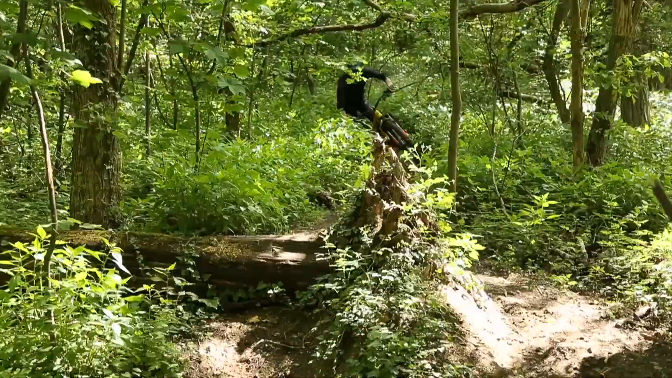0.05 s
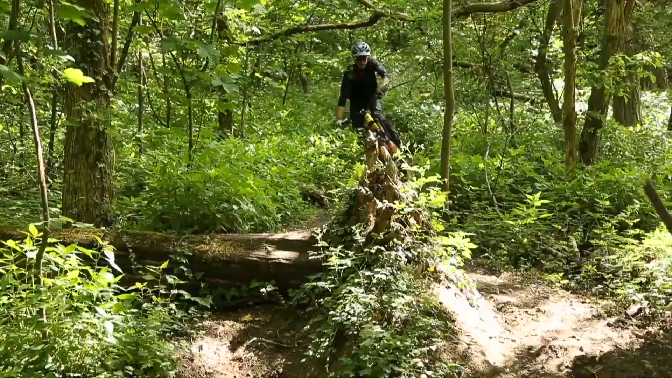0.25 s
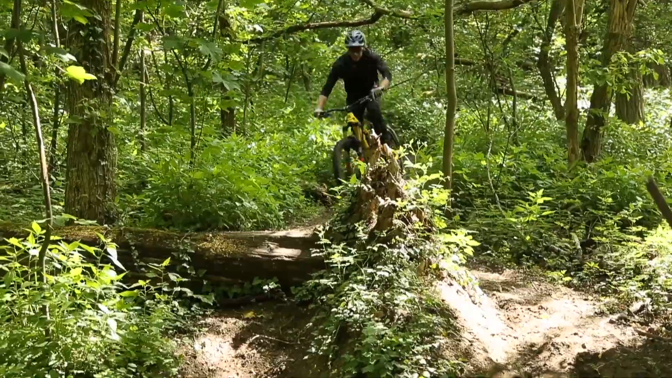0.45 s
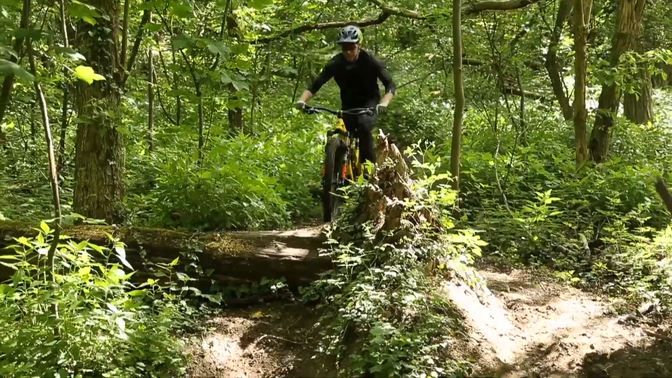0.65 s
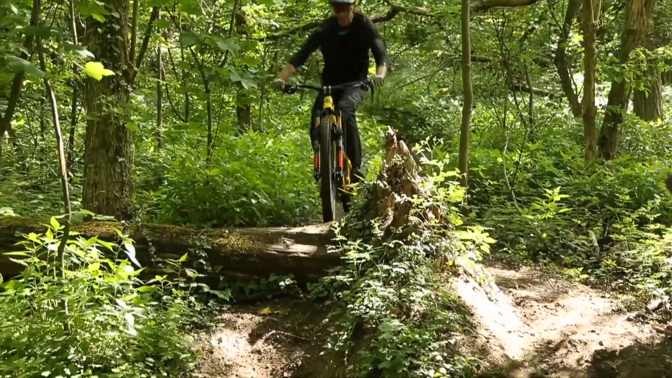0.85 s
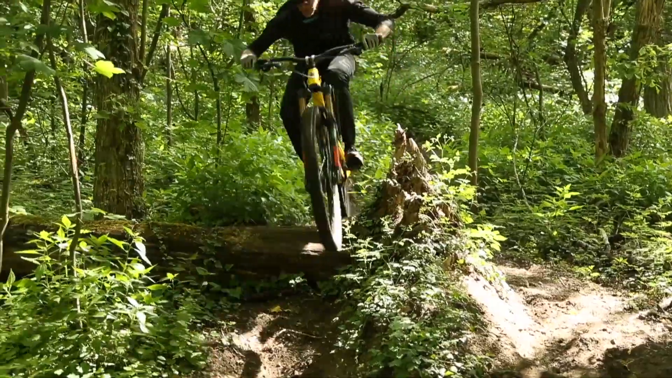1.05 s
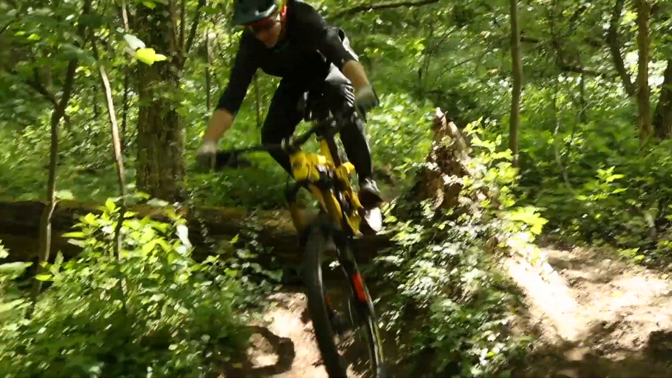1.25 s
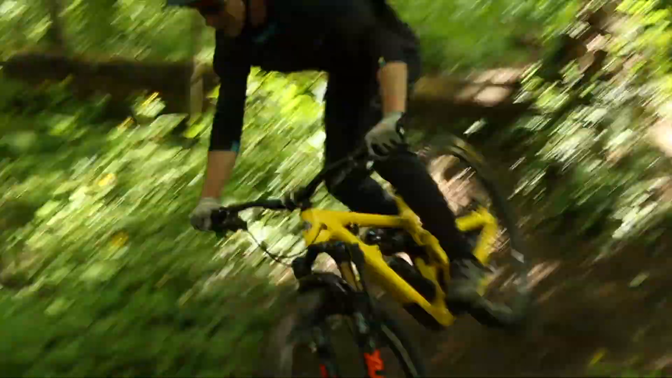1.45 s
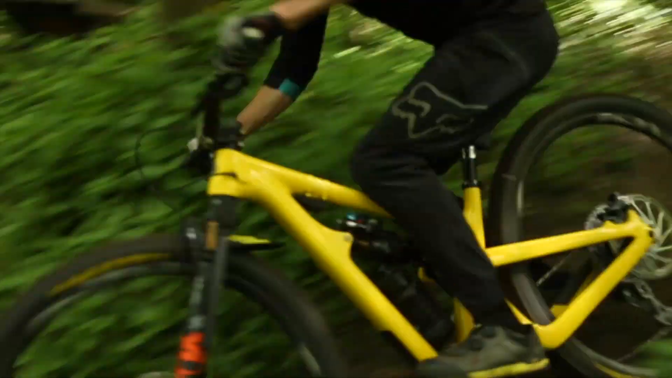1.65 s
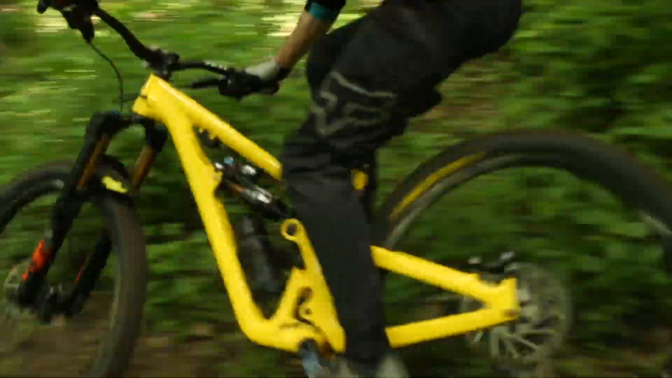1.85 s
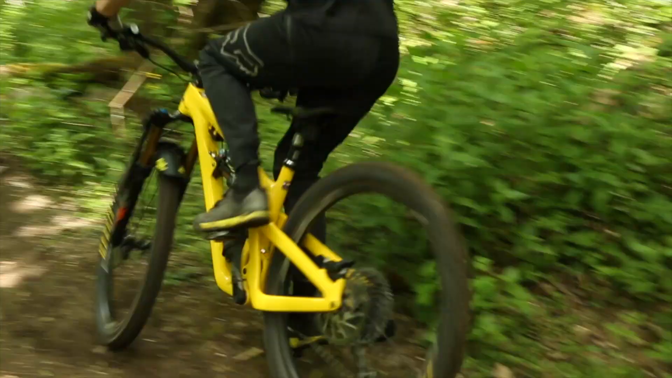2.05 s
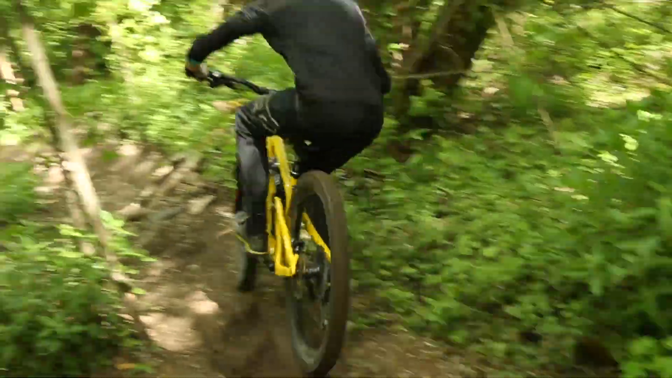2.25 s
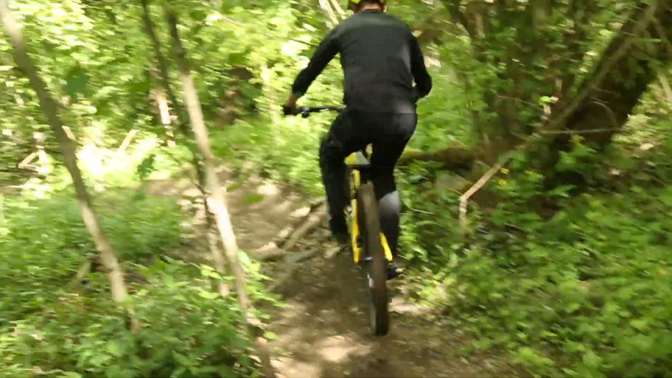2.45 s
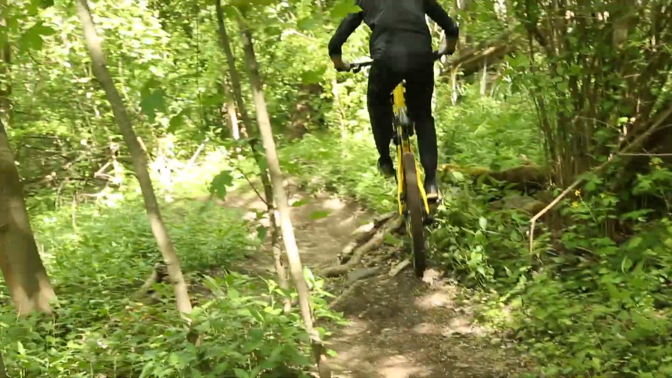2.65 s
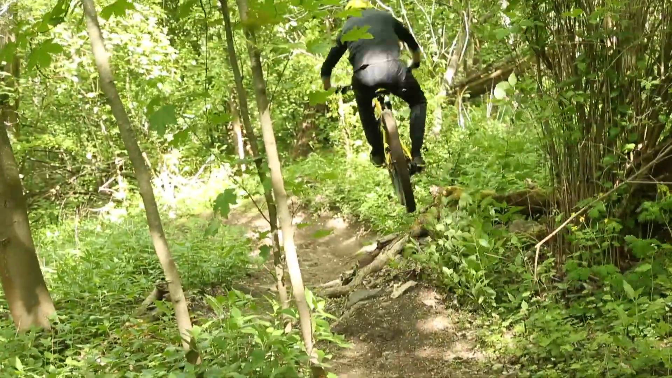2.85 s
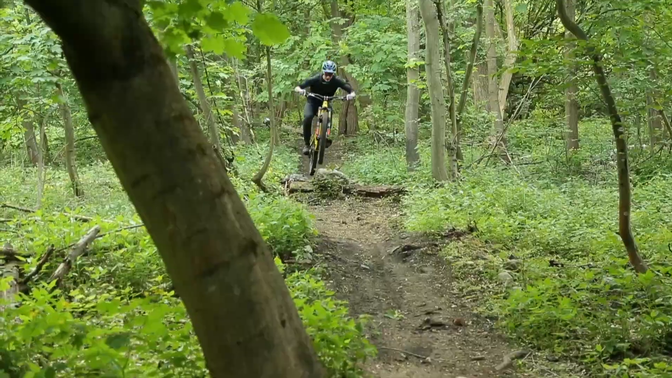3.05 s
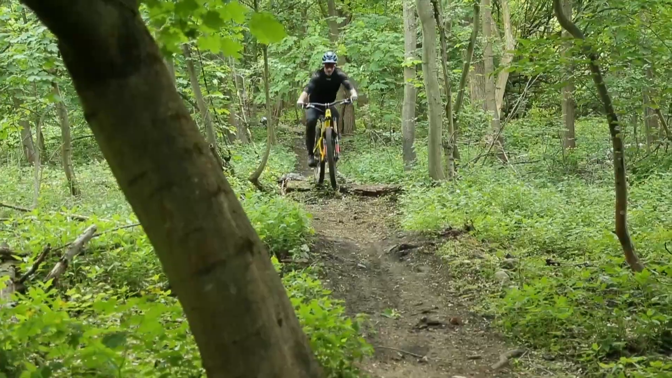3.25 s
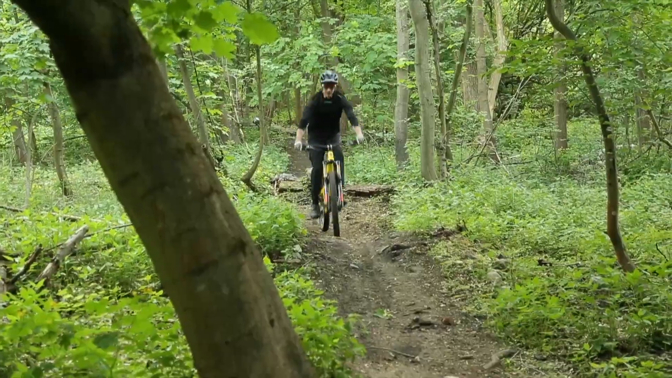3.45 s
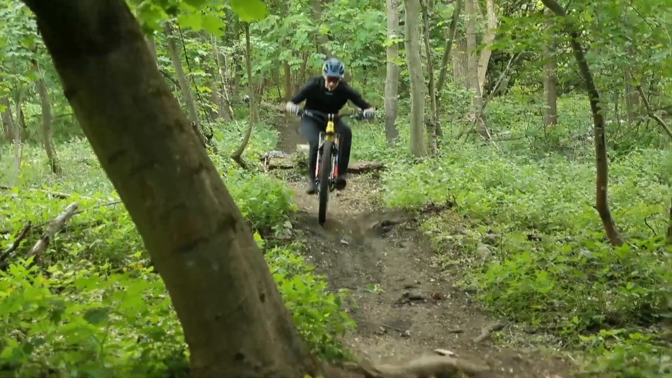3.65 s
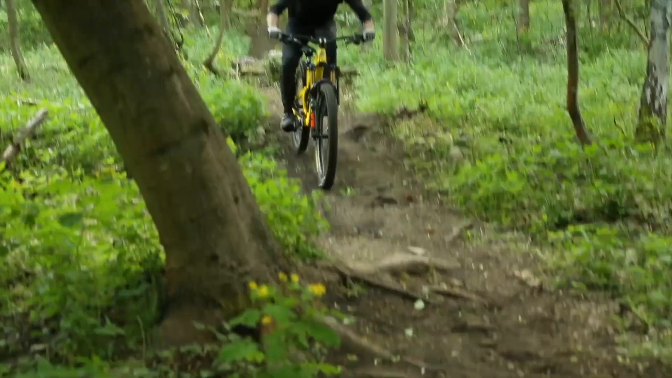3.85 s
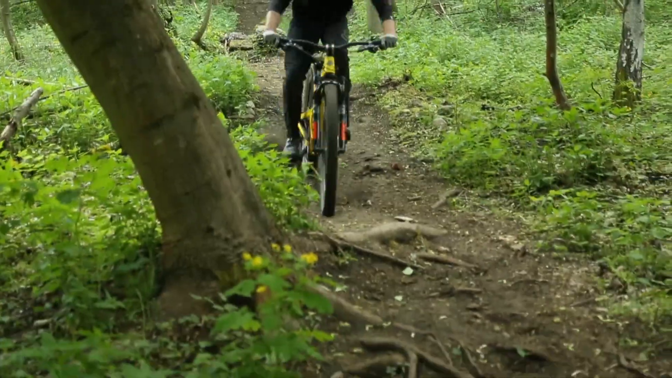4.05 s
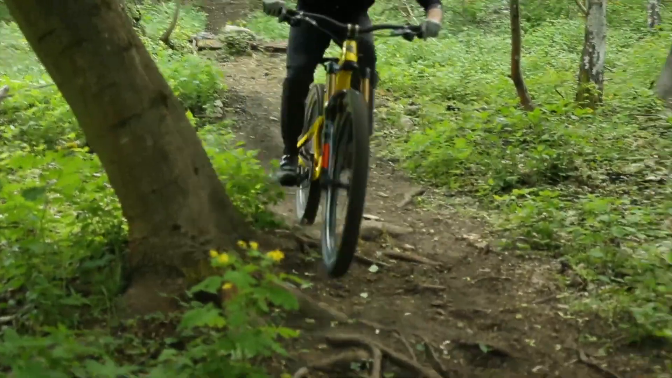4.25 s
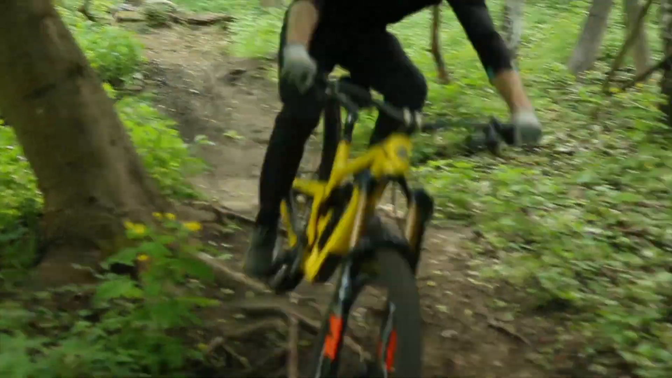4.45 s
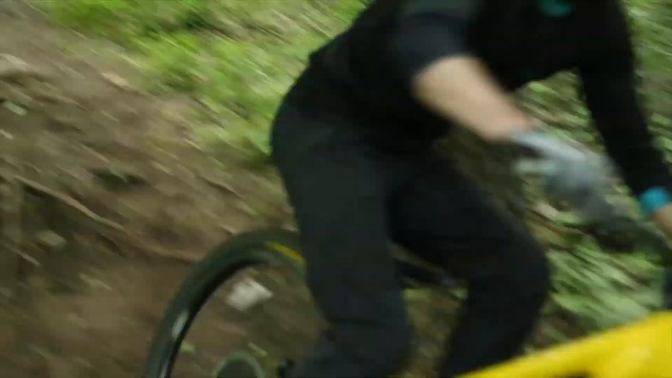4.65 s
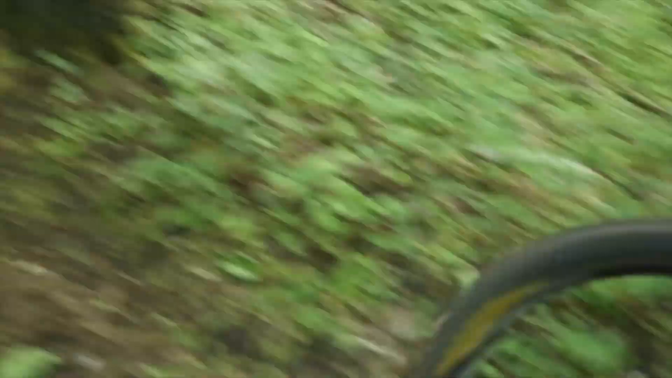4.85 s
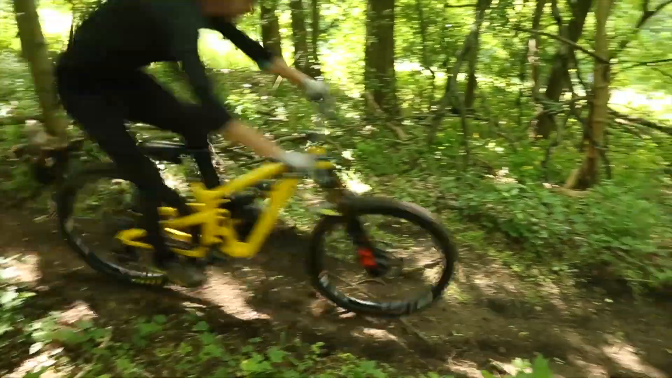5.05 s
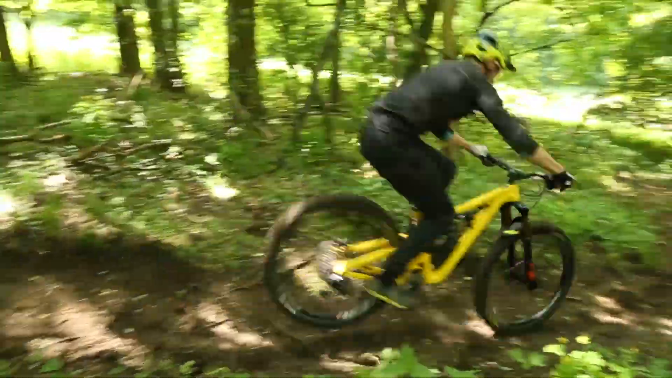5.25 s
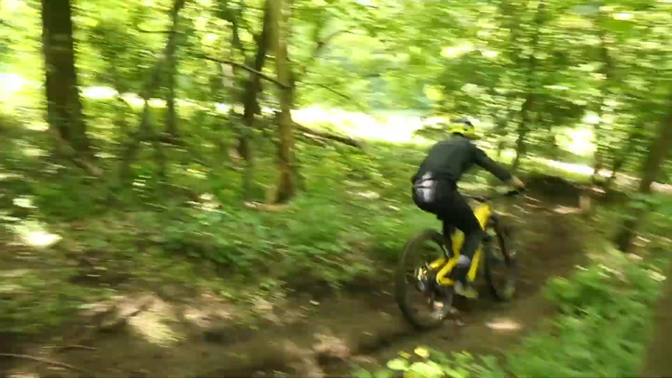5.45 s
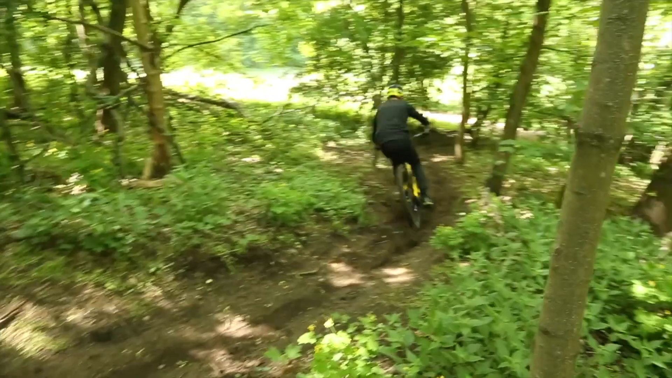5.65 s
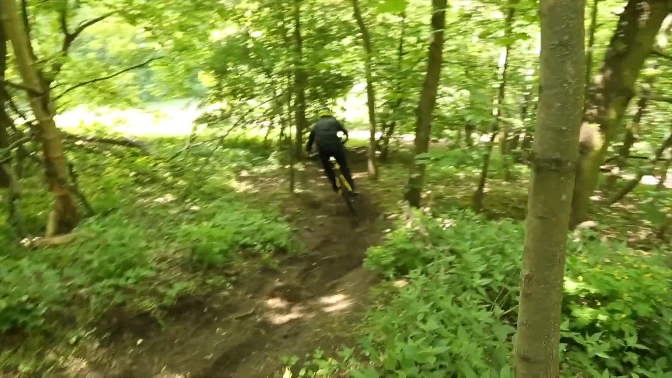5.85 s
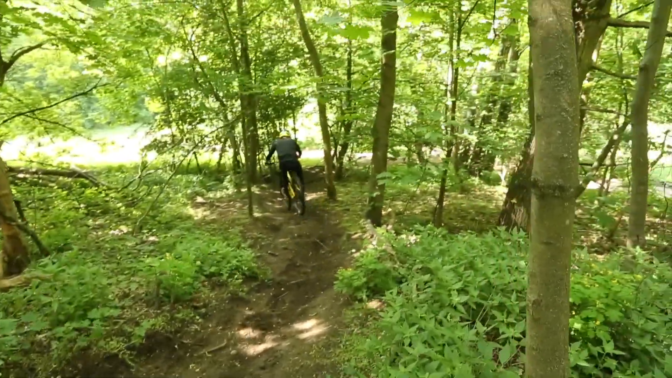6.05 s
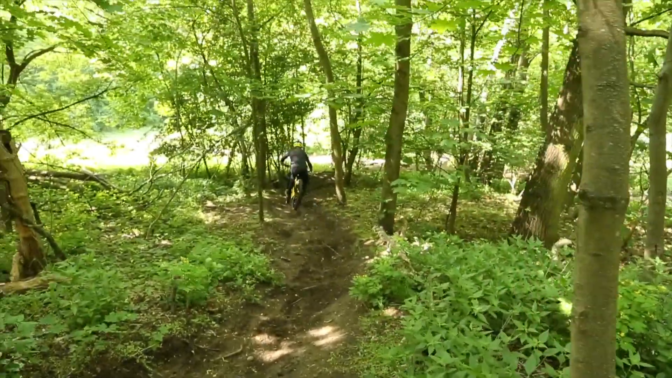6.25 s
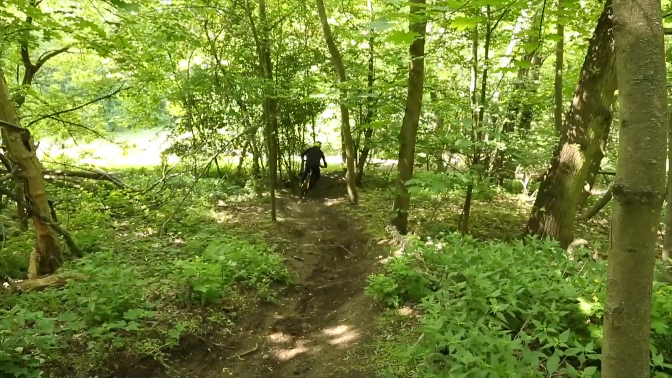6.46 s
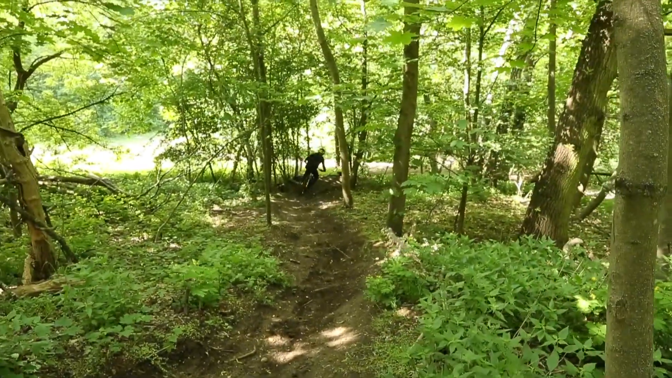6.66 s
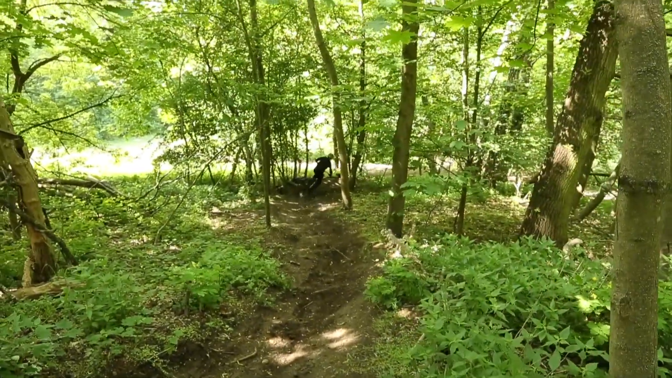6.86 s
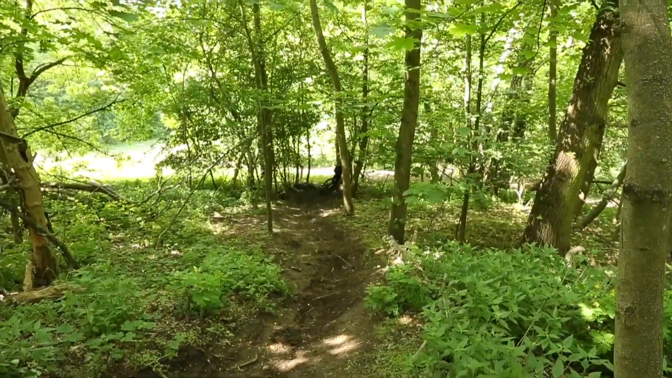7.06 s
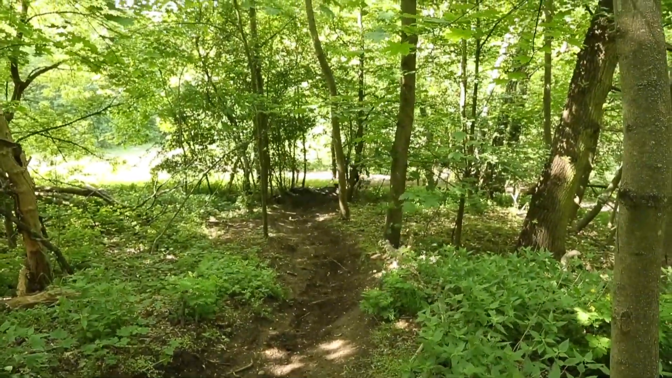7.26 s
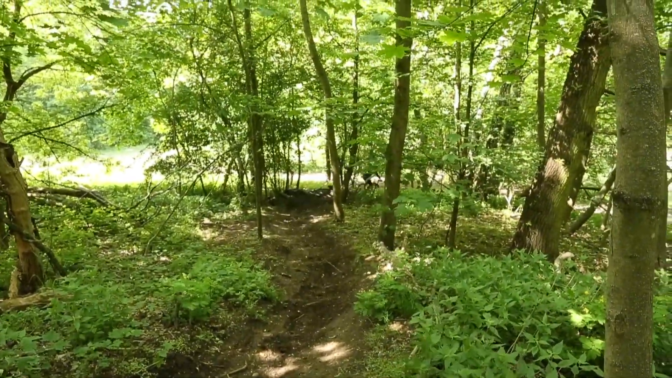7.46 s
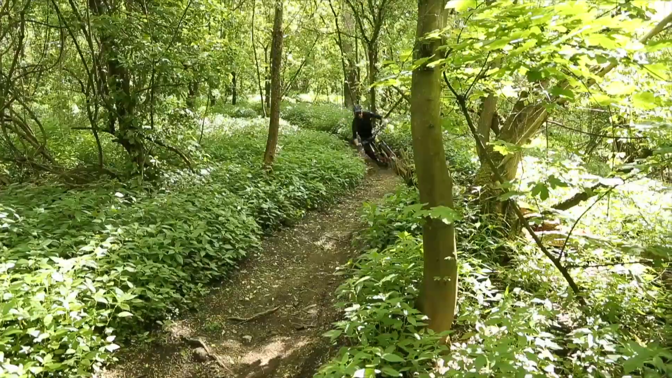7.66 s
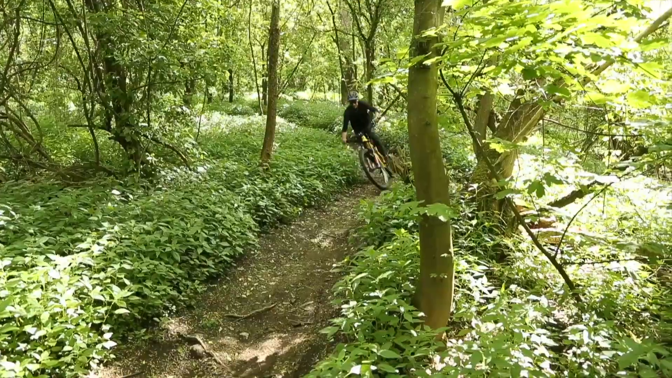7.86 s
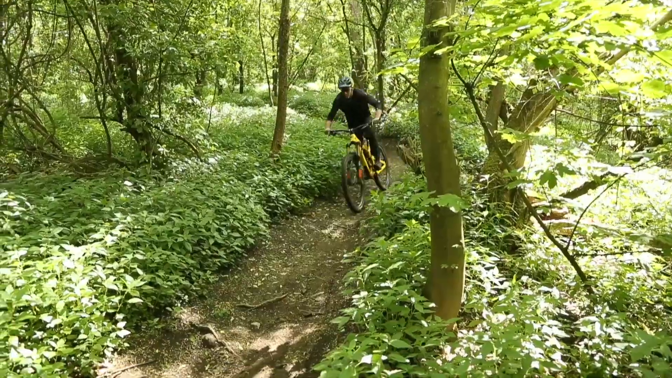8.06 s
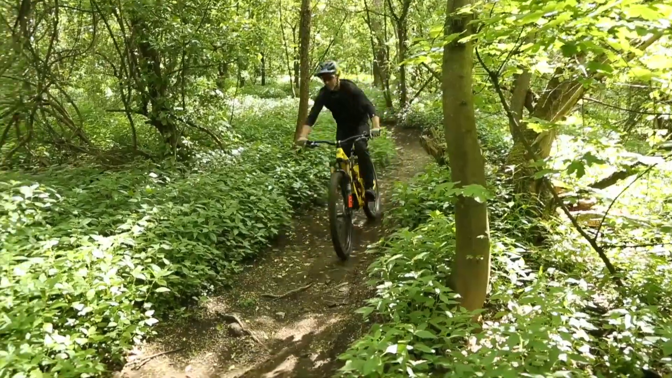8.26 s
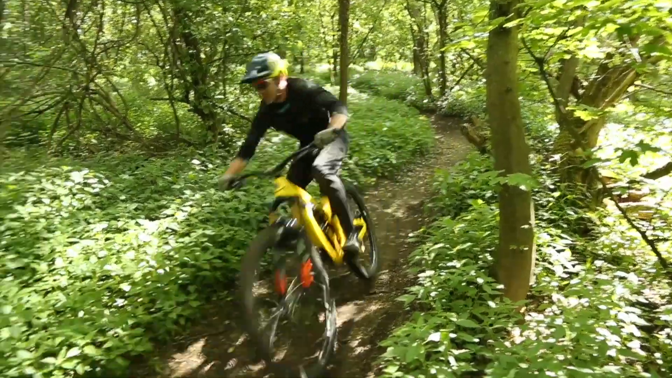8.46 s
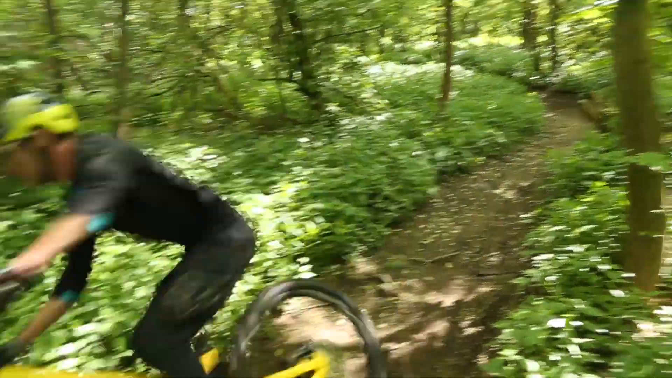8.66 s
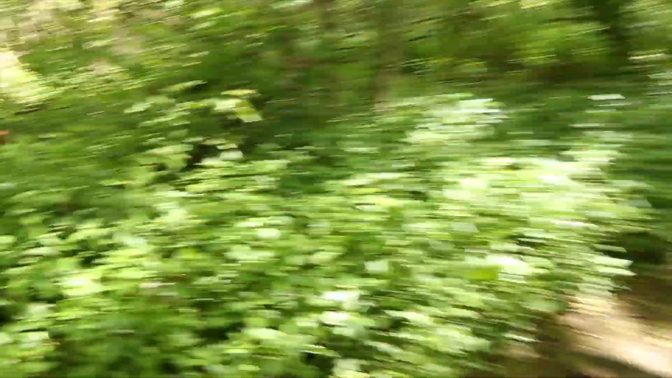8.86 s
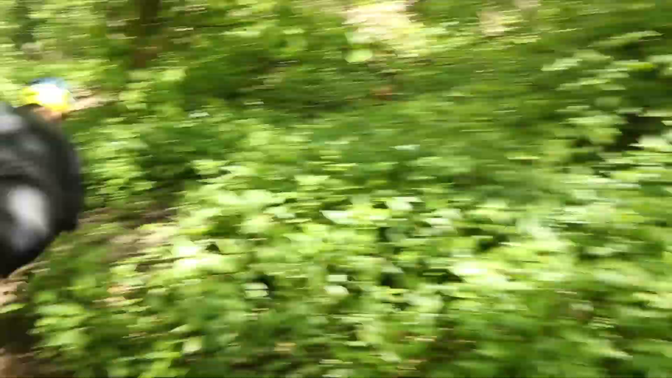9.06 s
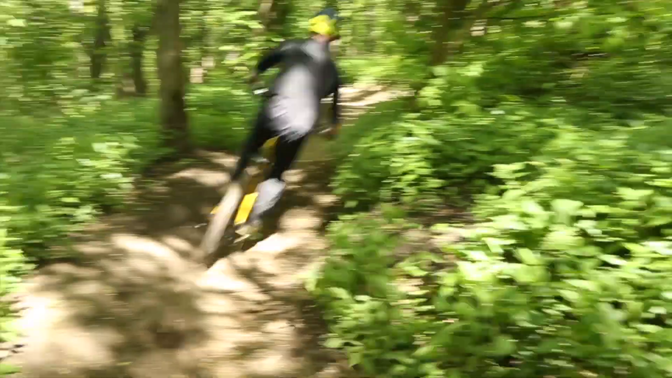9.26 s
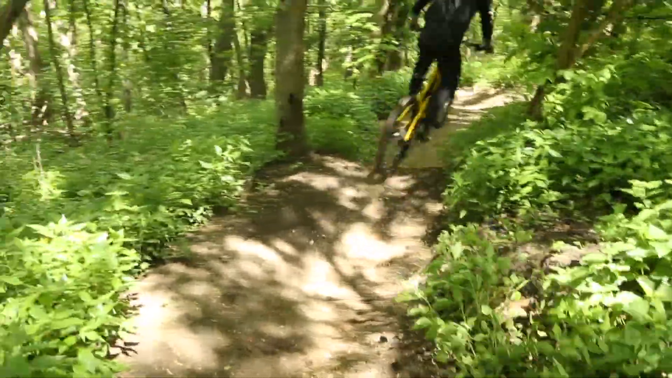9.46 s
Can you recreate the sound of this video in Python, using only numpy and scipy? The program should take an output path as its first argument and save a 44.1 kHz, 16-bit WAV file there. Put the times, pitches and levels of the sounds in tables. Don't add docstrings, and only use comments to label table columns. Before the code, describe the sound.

A fixed trailside microphone in quiet woodland hears a bicycle's ticking hub approach, rattle past and recede. A second approach starts softer and swells to a bright close buzz around the middle, then drifts far away with scattered knocks. A final run arrives suddenly, with heavy clacks, thuds, cracking grit and rumbling tyres right by the microphone, and is still buzzing at the end. Loose links tinkle lightly and trunks return brief echoes.

```python
import sys
import numpy as np
from scipy import signal
from scipy.io import wavfile
from scipy.ndimage import map_coordinates

SR = 44100
rng = np.random.default_rng(int(sys.argv[2]) if len(sys.argv) > 2 else 0)


def generate_wav(sig):
    pcm = np.round(np.clip(np.atleast_2d(sig).T, -1, 1) * 32767).astype(np.int16)
    wavfile.write(sys.argv[1], SR, pcm)


def gain_from_decibels(decibels):
    exponent = np.asarray(decibels, float) / 20
    return 10 ** exponent


N = 419832
EDGE_HZ = 15730


def evened(x):
    return x / np.sqrt(np.mean(x ** 2) + 1e-20)


def read(points, hz):
    f, value = np.transpose(points)
    return np.interp(np.log(hz + 1), np.log(f + 1), value)


def columns(rows):
    s, *values = np.transpose(rows)
    return [np.interp(np.arange(N) / SR, s, v) for v in values]


def colour(x, points):
    log_gain = np.log(gain_from_decibels(read(points, abs(np.fft.fftfreq(8192, 1 / SR)))))
    taps = np.fft.ifft(np.exp(np.conj(signal.hilbert(log_gain)))).real[:4096]
    return evened(signal.oaconvolve(x, taps)[:len(x)])


def ring(x, hz, width):
    turn = np.exp(2j * np.pi * np.cumsum(hz * np.ones(len(x))) / SR)
    r = np.exp(-np.pi * width / SR)
    return evened((turn * signal.lfilter([1 - r], [1, -r], x / turn)).real)


def soften(x, hz):
    return signal.sosfilt(signal.butter(N=4, Wn=hz, fs=SR, output="sos"), x)


def drift(per_s):
    knots = rng.standard_normal(2000)
    return map_coordinates(knots, [np.arange(N) / SR * per_s], order=3)


def body(x, modes, wander_db, per_s):
    total = 0
    for hz, width, db in modes:
        strength = gain_from_decibels(db + wander_db * drift(per_s))
        total = total + strength * ring(x, hz * (1 + 0.014 * drift(6)), width)
    return evened(total)


def grains(per_s, spread_db):
    size = gain_from_decibels(spread_db * np.minimum(rng.exponential(1, N), 4))
    return evened(size * rng.standard_normal(N) * (rng.random(N) < per_s / SR))


def pauses(rows, back_s):
    t = np.arange(N) / SR
    return sum(np.interp(t, np.cumsum([s, sink, stay, back_s]), [0, db, db, 0])
               for s, sink, stay, db in rows)


def surge(s, db, rise, hold, fall_db_per_s):
    t = np.arange(N) / SR - s
    return np.clip(t / rise, 0, 1) * gain_from_decibels(db - fall_db_per_s * np.clip(t - hold, 0, 2))


def pings(rows, cycles, grit):
    out, t = np.zeros(N + SR), np.arange(4000) / SR
    for (s, db, hz), noise in zip(rows, rng.standard_normal((len(rows), 4000))):
        u = t * hz / cycles
        swell = u * np.exp(1 - u)
        tone = np.sin(2 * np.pi * hz * t + .5 * noise[0]) + grit * ring(noise, hz, 0.63 * hz)
        out[round(s * SR):][:len(t)] += gain_from_decibels(db) * soften(swell * tone, min(4 * hz, EDGE_HZ))
    return out[:N]


def wood():
    # f/Hz, level/dB
    leaves = [(15, -42), (25, -17), (74, -11), (1040, -9), (2550, 13), (4370, 1), (6210, -11), (8140, 6),
              (16000, -27)]
    return gain_from_decibels(-51) * colour(rng.standard_normal(N), leaves)


def trees(x):
    # f/Hz, t60/s
    decay = [(100, 0.39), (1000, 0.63), (4000, 0.34), (12000, 0.13)]
    taps = np.zeros(SR // 2)
    count = (SR // 2 - 301) // 20
    at = np.arange(300, SR // 2 - 20, 20) + rng.integers(0, 20, count)
    taps[at] = rng.choice([-1., 1.], count)
    hz, t, z = signal.stft(taps, SR, nperseg=256)
    tail = signal.istft(z * gain_from_decibels(-60 * t / read(decay, hz)[:, None]), SR, nperseg=256)[1]
    return signal.oaconvolve(x, tail / np.linalg.norm(tail))[:N]


def tinkles():
    # t/s, peak level/dB, ring f/Hz
    links = [(1.426, -35, 3880), (1.682, -29, 4430), (1.953, -28, 3000), (2.1814, -28, 3220),
             (4.227, -33, 3930), (4.3086, -33, 3160), (4.7119, -22, 3440), (4.813, -22, 4160),
             (4.825, -19, 4000), (5.1407, -18, 4700), (5.148, -24, 4400), (5.198, -21, 4530),
             (5.212, -23, 4300), (5.235, -23, 4900), (5.267, -28, 2440), (6.1805, -33, 4150),
             (7.631, -31, 3400), (8.374, -29, 4740), (8.5787, -27, 4680)]
    out, t = np.zeros(N + SR), np.arange(3000) / SR
    for (s, db, hz), noise in zip(links, rng.standard_normal((len(links), 3000))):
        scrape = noise * (t / .004) * np.exp(-t / 0.0044)
        link = soften(ring(scrape, hz, 460), 6200)
        out[round(s * SR):][:len(t)] += gain_from_decibels(db + 8.0) * link / abs(link).max()
    return out[:N]


def snaps():
    # t/s, peak level/dB, centre f/Hz
    cracks = [(1.0368, -21, 1710), (1.2218, -22, 1450), (1.5527, -17, 1760), (1.5594, -16, 1370),
              (1.6622, -8, 1988), (1.7153, -9, 1790), (1.8375, -11, 2500), (1.9318, -24, 1310),
              (2.06, -15, 1700), (2.1119, -18, 1380), (2.1837, -19, 2930), (2.6375, -25, 1500),
              (3.4309, -28, 3200), (3.5269, -26, 1350), (3.5456, -29, 3150), (3.5985, -22, 1230),
              (4.0061, -21, 1490), (4.0212, -11.5, 1190), (4.027, -15, 1510), (4.062, -14, 1820),
              (4.1122, -17, 1410), (4.1859, -17, 1340), (4.2286, -12.5, 2930), (4.3097, -17, 3130),
              (4.4458, -26, 1220), (4.8362, -10, 3700), (4.8634, -10, 1580), (5.0288, -10, 2430),
              (5.0682, -10, 7760), (5.2408, -7, 5180), (5.715, -15, 2380), (5.8985, -13, 2700),
              (5.9048, -21, 1970), (7.6403, -15, 2360), (8.2325, -18, 1937), (8.3125, -13, 1100),
              (8.3205, -10.5, 1200), (8.3522, -11, 1340), (8.3759, -8, 4930), (8.4038, -16, 1360),
              (8.4487, -11, 1390), (8.5807, -2.5, 5250), (8.6381, -6, 2000), (8.7309, -13, 1350),
              (8.7585, -19, 1320), (8.7768, -3, 1200), (8.8955, -8, 1250), (9.0614, -12, 7600),
              (9.0923, -17, 2910)]
    return gain_from_decibels(-4.5) * pings(cracks, 0.59, 0.35)


def raps():
    # t/s, peak level/dB, ring f/Hz
    pebbles = [(0.7563, -33, 670), (0.8171, -30, 760), (1.0356, -28, 615), (1.5697, -13, 1080),
               (1.697, -17, 800), (1.7114, -26, 1120), (1.7488, -18, 770), (2.5509, -26, 1040),
               (3.8285, -25, 1030), (4.0041, -23, 1280), (4.4441, -20, 640), (4.646, -16, 930),
               (4.9418, -20, 735), (5.157, -23, 1030), (5.2067, -24, 1010), (5.406, -28, 1030),
               (5.627, -19.5, 1110), (6.0004, -21, 950), (6.0325, -23, 710), (6.1071, -23, 1440),
               (6.165, -25, 680), (6.4127, -15.5, 680), (6.9779, -28, 833), (7.0951, -30, 794),
               (7.711, -23, 830), (7.8689, -27, 627), (8.2737, -16, 650), (8.5371, -24, 579),
               (8.8935, -12, 1160), (9.2417, -22, 730), (9.4076, -22, 660)]
    return gain_from_decibels(-4.0) * pings(pebbles, 1.47, 0.49)


def booms():
    # t/s, peak level/dB, ring f/Hz
    bumps = [(0.6303, -38, 271),  (0.8159, -44, 240), (0.9354, -35, 240), (1.5754, -21.5, 270),
             (1.697, -18.5, 262), (1.9777, -26, 304), (2.0154, -24, 218), (2.0738, -25.5, 304),
             (2.1778, -33, 247), (2.4399, -39, 240), (2.535, -30, 240), (2.8909, -44, 200),
             (3.0283, -42.5, 240), (3.4117, -47, 350), (3.6205, -34, 219), (3.6619, -37, 380),
             (4.1707, -30.5, 230), (4.2346, -33, 213), (5.0453, -28.5, 165), (5.0979, -25.5, 195),
             (5.1271, -25, 240), (5.5294, -24, 230), (5.6319, -28.5, 148), (5.9298, -19, 254),
             (6.0849, -35.5, 226), (6.3263, -22, 260), (6.413, -19, 280), (6.9355, -37, 250),
             (7.0934, -42, 240), (7.3051, -42, 288), (7.6286, -29, 271), (7.8895, -32, 232),
             (9.315, -26, 380), (9.362, -26, 210)]
    # t/s, peak level/dB, ring f/Hz
    more_bumps = [(4.663, -19, 134.5), (4.808, -23, 155), (4.899, -31, 160), (8.632, -25, 136),
                  (8.722, -17.5, 332), (8.775, -22, 373), (8.827, -21, 287), (8.855, -25, 345),
                  (8.894, -17, 398), (8.94, -20, 352), (8.965, -18.5, 370), (8.991, -19, 284),
                  (9.057, -25, 345), (9.124, -34, 307)]
    return gain_from_decibels(-2.0) * pings(bumps + more_bumps, 1.5, 0.55)


def knocks():
    # t/s, peak level/dB, frame ring f/Hz, rattle/s
    clacks = [(0.409, -24.5, 620, 0.036), (1.572, -8.5, 1020, 0.022), (1.685, -13, 730, 0.031),
              (2.282, -13.5, 724, 0.0063), (3.521, -22.5, 835, 0.013), (3.998, -21, 1330, 0.0059),
              (4.019, -17.5, 1020, 0.034), (4.0497, -11, 900, 0.0085), (4.1115, -26, 1373, 0.003),
              (4.27, -19, 1030, 0.0059), (4.295, -14.5, 1200, 0.0051), (4.666, -4, 706, 0.012),
              (4.73, -20, 883, .0073), (5.155, -18, 1030, 0.0087), (5.884, -11, 825, 0.0095),
              (6.32, -14.5, 660, 0.02), (6.434, -16.5, 700, 0.016), (6.908, -20, 706, 0.027),
              (7.662, -13.5, 540, 0.011), (8.2735, -10.5, 800, 0.006), (8.401, -15, 524, 0.0096),
              (8.444, -14, 594, 0.013), (8.703, 2, 2250, 0.0033), (8.7707, 1.5, 1080, 0.0066),
              (9.155, -17.5, 596, 0.015)]
    # t/s, peak level/dB, frame ring f/Hz, rattle/s
    roots = [(1.037, -23, 1740, 0.0052), (1.222, -24, 1110, 0.0089), (1.422, -19, 675, 0.0096),
             (1.552, -8.5, 900, 0.013), (2.106, -23, 558, 0.0071), (2.634, -18, 1210, 0.011),
             (3.5968, -16.5, 520, 0.0086), (3.967, -25, 510, 0.0075), (4.445, -15, 690, 0.0068),
             (4.565, -16, 510, 0.0092), (4.769, -19, 1330, 0.0068), (5.109, -17, 740, 0.0073),
             (5.435, -10.5, 1230, 0.011), (5.76, -21, 520, 0.0068), (5.8, -17, 1310, 0.018),
             (5.934, -14, 945, 0.0054), (6.41, -15.5, 600, 0.012), (7.036, -22.5, 500, 0.0089),
             (8.203, -22, 499, 0.029), (8.306, -11.5, 686, 0.03), (8.634, -5, 1100, 0.014),
             (8.856, -9, 810, 0.016), (8.894, -18, 1250, 0.0092), (9.231, -14, 510, 0.028)]
    # t/s, peak level/dB, frame ring f/Hz, rattle/s
    stones = [(0.609, -23, 664, 0.024), (0.757, -23.5, 590, 0.021), (1.66, -25, 1866, .003),
              (1.945, -14, 634, 0.034), (2.006, -11.5, 1070, 0.0061), (2.052, -16, 980, 0.016),
              (2.165, -21, 1270, 0.0092), (2.26, -20, 786, 0.019), (4.713, -14, 844, 0.0071),
              (4.912, -14, 1580, 0.0099), (5.424, -10, 950, 0.012), (5.898, -17, 1930, .005),
              (6.38, -16, 645, 0.02), (6.822, -17.5, 890, 0.0056), (6.834, -19, 800, 0.014),
              (7.634, -18, 1110, 0.019), (8.376, -12.5, 513, 0.0065), (8.535, -24, 517, 0.016),
              (8.579, -9.5, 2600, .008), (8.688, -7, 770, 0.019), (8.939, -11.5, 880, 0.044),
              (9.02, -9, 1900, 0.014)]
    # thump relative level/dB, snap relative level/dB
    kinds = [
        (-16, -21),
        (-7, 8),
        (-17.5, 11),
    ]
    out, t = np.zeros(N + SR), np.arange(4000) / SR
    rows = [(*row, *kind) for table, kind in zip([clacks, roots, stones], kinds) for row in table]
    chance = rng.standard_normal((len(rows), 4000))
    bounce = rng.random((len(rows), 4000)) < 1500 / SR
    for (s, db, hz, rattle, thump_db, snap_db), noise, hit in zip(rows, chance, bounce):
        fading = gain_from_decibels(-11 * (t / np.clip(rattle, .001, .1)) ** 2)
        drive = (hit + 0.26) * noise * fading
        drive[30] = -3.2 * min(1, 0.0075 / rattle)
        frame = ring(drive, hz, 0.18 * hz)
        frame = frame + 1.36 * ring(drive, 1.2 * hz, 1.67 * hz) + .5 * ring(drive, 0.77 * hz, 530)
        squash = np.sin(np.pi * np.minimum(t / 0.0028, 1)) + .5 * noise * fading
        thump = ring(squash, 272, 105) + 0.51 * ring(squash, 134, 40) + 0.18 * ring(squash, 64, 45)
        snap = ring(drive, 6000, 1800)
        parts = [(-.5, soften(frame, 3970)), (thump_db, soften(thump, 550)),
                 (snap_db - 20.0, soften(snap, 9200))]
        at = round(s * SR)
        out[at:at + len(t)] += sum(gain_from_decibels(db + g) * p / abs(p).max() for g, p in parts)
    return out[:N]


def tyres():
    # t/s, load as crunch level/dB, extra drumming on hard
    # ground/dB
    passes = [
        [(0.0, -42.5, -3), (0.3, -53, 1.5), (1.09, -46.5, -4), (1.45, -41, -1), (1.7, -26.5, -3.5),
         (1.87, -34, 2), (2.2, -38, -6), (2.6, -46, 1.5), (3.05, -53.5, -2.5)],
        [(3.45, -61, 2.5), (3.55, -44, -2), (4.14, -37, -7.5), (4.6, -37.5, 0.5), (4.75, -28, -2.5),
         (5.12, -45, 6.5), (5.45, -34.5, -3.5), (5.83, -34, 0), (6.2, -42.5, -1.5)],
        [(6.45, -39.5, 1.5), (6.9, -55.5, 6.5), (7.05, -44.5, 0), (7.24, -59.5, 10), (7.6, -54, -2)],
        [(7.66, -37.5, -2.5), (7.8, -45.5, 4.5), (8.03, -44, 2.5), (8.4, -42, 4), (8.66, -28.5, 1),
         (8.83, -30.5, -2.5), (9.02, -30.5, 3), (9.1, -41, 5.5), (9.52, -38.5, 0.5)],
    ]
    # t/s, unloading/s, airborne/s, depth/dB
    lifts = [(1.23, 0.093, 0.12, -6.5), (1.46, .02, 0.063, -1.5), (1.59, 0.012, 0.01, -10),
             (3.72, 0.035, 0.19, -2.5), (3.86, 0.038, 0.098, -6.5), (4.31, 0.021, 0.1, -6),
             (4.47, 0.042, 0.043, -19), (4.93, 0.076, 0.048, -10), (5.19, 0.074, 0.067, -11),
             (6.06, 0.12, 0.042, -8), (6.22, 0.0537, 0.051, -1), (6.53, 0.034, 0.085, -4.5),
             (7.95, 0.13, .145, -13), (8.47, 0.01, 0.16, -6.5)]
    # t/s, thud level/dB
    landings = [(0.0, -45), (0.1, -39), (1.422, -34), (1.552, -46), (2.634, -35), (3.17, -50), (3.521, -48),
                (3.597, -32), (4.13, -39), (4.445, -39), (4.666, -24), (5.422, -27), (6.321, -40),
                (7.633, -45), (8.307, -31), (8.634, -28), (8.856, -26)]
    # t/s, length/s, level/dB, f/Hz
    hums = [
        (4.57, .05, -37, 235),
        (4.95, .08, -42.5, 400),
        (7.835, 0.15, -39, 233),
        (9.4, 0.1, -39, 230),
    ]
    # f/Hz, width/Hz, level/dB
    casing = [(240, 88, 2), (322, 240, -0.5), (164, 67, -5.5)]
    # f/Hz, level/dB
    crunch = [(300, -29), (520, 1.5), (800, 4), (1300, 0.5), (2000, 0.5), (3500, -14.5), (7000, -37)]
    # f/Hz, level/dB
    ground = [(20, -22), (40, -26), (55, 8), (110, 2.5), (170, -0.5), (300, -52)]
    fall_db_per_s = 240
    load_db, hard_db = columns(sum(passes, []))
    lift_db = pauses(lifts, 0.0052)
    crunch_db = load_db + lift_db
    drum_db = crunch_db + hard_db + 0.22 * lift_db
    thud = gain_from_decibels(0.33 * (load_db + 33.0) - 37.5 - 13 + 0.36 * lift_db)
    thud = thud + sum(surge(s, db, 0.0022, 0.0059, fall_db_per_s) for s, db in landings)
    bumps = gain_from_decibels(1.5 * drift(28))
    knobs = bumps * (grains(900, 1.6) + 0.8 * rng.standard_normal(N))
    grit = bumps * gain_from_decibels(2.76 * drift(60)) * (grains(1300, 2.0) + 0.55 * rng.standard_normal(N))
    soil = gain_from_decibels(2.1 * drift(18)) * rng.standard_normal(N)
    drum = soften(body(knobs, casing, 1.6, 12), 1180)
    t = np.arange(N) / SR
    hum = sum(surge(s, db, 0.0098, length, 2 * fall_db_per_s) * np.sin(2 * np.pi * hz * t) * np.sqrt(2)
              for s, length, db, hz in hums)
    rolling = gain_from_decibels(drum_db + 1.7) * drum + gain_from_decibels(crunch_db + 1.0) * colour(grit, crunch)
    return hum + rolling + gain_from_decibels(-1.5) * thud * colour(soil, ground)


def sings():
    # t/s, length/s, level/dB, f/Hz
    whistles = [(1.69, 0.14, -36, 4300), (3.13, .25, -49.5, 8270), (3.16, .1, -47, 4400),
                (3.387, .04, -47, 4000), (4.966, 0.02, -26, 8200), (5.05, 0.11, -21.5, 7930),
                (5.185, 0.031, -26, 8900), (2.45, 0.13, -37, 4120), (4.85, 0.18, -32.5, 2170),
                (6.832, 0.013, -33, 780), (1.946, 0.02, -31.5, 560), (5.336, .03, -32, 8300),
                (6.7, 0.043, -46, 2340), (1, 0.24, -49, 2600), (8.934, 0.14, -28, 7850),
                (3.06, .3, -52, 2570), (9.2, .2, -36, 4100), (7.12, .3, -49, 4300)]
    out, t = np.zeros(N + SR), np.arange(16000) / SR
    for (s, length, db, hz), noise in zip(whistles, rng.standard_normal((len(whistles), 16000))):
        shape = np.clip(t / 0.0037, 0, 1) * gain_from_decibels(-700 * np.clip(t - length, 0, 1))
        out[round(s * SR):][:len(t)] += gain_from_decibels(db) * shape * ring(noise, hz, 190)
    return out[:N]


def hub():
    # t/s, nearness as buzz level/dB, low rings as drive side
    # turns/dB
    passes = [
        [(0.0, -43, 2), (0.25, -43.5, 0), (1.11, -38.5, -0.5), (1.46, -31.5, -1), (1.75, -29.5, 2.5),
         (2.25, -31, -1), (2.6, -33, 1.5), (2.7, -35.5, 1.5), (3.045, -40.5, 1)],
        [(3.056, -48.5, 4), (3.55, -44, 4.5), (3.95, -39, 2.5), (4.15, -41, 3), (4.23, -34, 0.5),
         (4.5, -31.5, 1), (4.85, -28.5, 4.5), (5.03, -25, 0.5)],
        [(5.07, -20.5, -5), (5.27, -21, -7.5), (5.5, -26, -0.5), (6.2, -29.5, -2.5), (6.52, -34, 0),
         (6.79, -37, 0), (7.08, -32.5, -2.5), (7.17, -37, -4), (7.56, -44, -1.5)],
        [(7.74, -38.5, 1), (8.03, -36.5, -1), (8.35, -33, 3), (8.6, -29, -1.5), (8.93, -20.5, -4),
         (9.055, -22.5, -3), (9.085, -26, -3), (9.52, -32, 2.5)],
    ]
    # t/s, slowing/s, stalled/s, depth/dB
    stalls = [(1.455, 0.1, 0.055, -10.5), (1.875, 0.07, .27, -16), (3.95, 0.086, 0.032, -9),
              (4.54, 0.088, 0.032, -20), (5.76, 0.034, 0.035, -3.5), (5.96, 0.048, .02, -4),
              (6.22, 0.078, 0.039, -8.5), (6.38, 0.038, 0.042, -5), (6.825, 0.053, 0.077, -13),
              (7.53, 0.095, 0.062, -9), (8.595, .015, 0.027, -6), (8.66, 0.024, 0.045, -3.5),
              (8.72, 0.043, .01, -9.5), (8.785, 0.0059, 0.016, -12), (8.865, 0.011, 0.0058, -7)]
    # t/s, level/dB, low rings relative level/dB
    jolts = [(.11, -46, 5), (1.297, -32, 1.5), (1.425, -38.5, 10), (1.573, -37, 5), (1.945, -38, 5.5),
             (2.05, -35, -3), (2.165, -36, 5), (3.597, -35.5, 3), (4.019, -41, 5), (4.44, -34, -1),
             (4.665, -36, 8), (4.81, -28, -7), (6.17, -29.5, -3), (7.633, -53, 22.5), (7.662, -45, 9),
             (8.37, -36, 5), (8.578, -26, -10), (8.634, -32.5, 11.5), (8.69, -29, 6.5), (8.769, -26.5, 3.5),
             (8.845, -25, -9)]
    # f/Hz, width/Hz, level/dB
    shell_low = [(2533, 250, -4.5), (2853, 170, -6), (4200, 420, 1.5), (4910, 310, -3)]
    # f/Hz, width/Hz, level/dB
    shell_high = [(6590, 210, 5), (7180, 550, 5), (7740, 280, 11), (8500, 1400, -10)]
    # f/Hz, level/dB
    tick_low = [(900, 0.5), (1500, 12), (2200, 4.5), (3500, 12), (5500, 10), (7000, -41.5)]
    # f/Hz, level/dB
    tick_high = [(4500, -37.5), (5600, -2), (7200, 0.5), (8500, 5.5), (10300, -5), (11500, -49)]
    # f/Hz, level/dB
    tick_air = [(8800, -23), (10200, 3), (11500, 5), (13500, -1), (15500, -4), (17000, -10)]
    pawls_per_s, fall_db_per_s = 205.5, 500
    level_db, low_db = columns(sum(passes, []))
    stall_db = pauses(stalls, 0.024)
    jars = [(surge(s, db, 0.0067, 0.015, fall_db_per_s), gain_from_decibels(rel_db)) for s, db, rel_db in jolts]
    buzz = gain_from_decibels(level_db + stall_db)
    low_buzz = buzz * gain_from_decibels(low_db - 0.31 * stall_db)
    high_gain = np.sqrt(buzz ** 2 + sum(g ** 2 for g, _ in jars))
    low_gain = np.sqrt(low_buzz ** 2 + sum((g * r) ** 2 for g, r in jars))

    together = surge(5.21, 0, .04, .15, fall_db_per_s)
    uneven = (1 - together) * (.08 * drift(3) + .2 * drift(150))
    teeth = np.cumsum(pawls_per_s * (1 + uneven)) / SR
    since = teeth % 1
    strength = gain_from_decibels(3.0 * rng.standard_normal(8000))[np.clip(teeth, 0, 7999).astype(int)]
    chatter = 1.45 + strength * np.exp(-since / 1.3)
    chatter = chatter + together * (2.0 * np.exp(-since / .25) - .8)
    drive, tick, tock, air = chatter * rng.standard_normal((4, N))

    high = evened(soften(body(drive, shell_high, 1.1, 25), 12000) + 1.67 * colour(tick, tick_high))
    low = evened(soften(body(drive, shell_low, 1.6, 12), 4820) + 0.76 * colour(tock, tick_low))
    air_db = -11.5 + 0.54 * low_db + 0.077 * (level_db + 34)
    air_db = air_db + 0.4 * pauses(stalls, 0.067) + 1.8 * drift(12)
    shake = gain_from_decibels(0.82 * drift(35))
    rings = gain_from_decibels(-0.84) * high_gain * high + gain_from_decibels(-1.37) * low_gain * low
    return shake * (rings + buzz * gain_from_decibels(air_db) * colour(air, tick_air))


def scene():
    blows = knocks() + tinkles()
    quiet = wood()
    bike = hub() + tyres()
    echo = trees(blows)
    small = snaps() + raps() + booms()
    mono = bike + blows + gain_from_decibels(-12.0) * echo + quiet + small + sings()
    return np.array([mono, mono])


def low_pass(x):
    return signal.sosfilt(signal.butter(12, 16340, fs=SR, output="sos"), x)


def record(dry):
    thin = signal.sosfilt(signal.butter(N=2, Wn=38, btype="high", fs=SR, output="sos"), dry)
    held = np.clip(thin, -.99, .99)
    edge = signal.firwin(1535, EDGE_HZ, window=("kaiser", 10), fs=SR)
    return low_pass(signal.oaconvolve(held, edge[None], "same"))


dry = scene()
out = record(dry)
generate_wav(out)
```